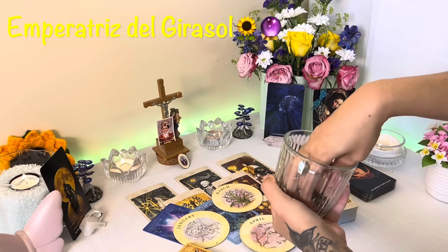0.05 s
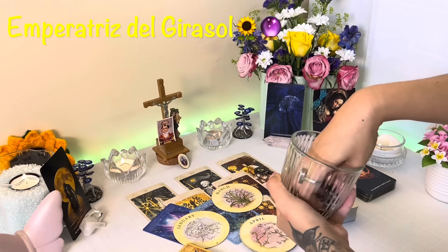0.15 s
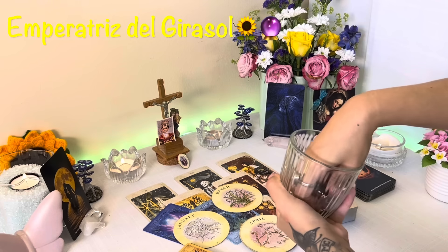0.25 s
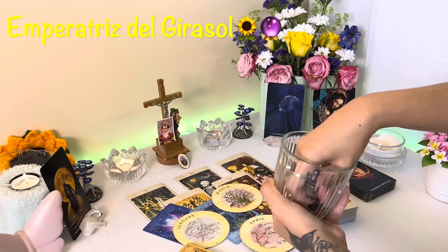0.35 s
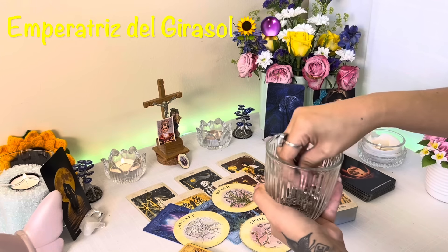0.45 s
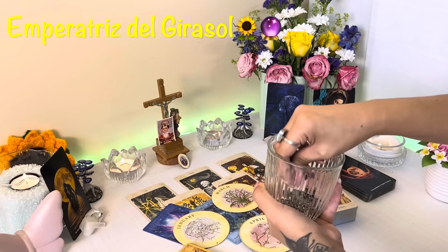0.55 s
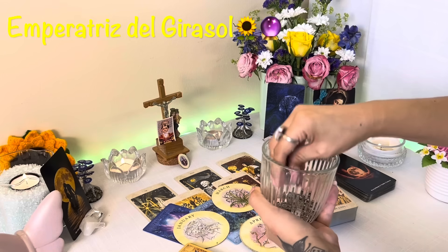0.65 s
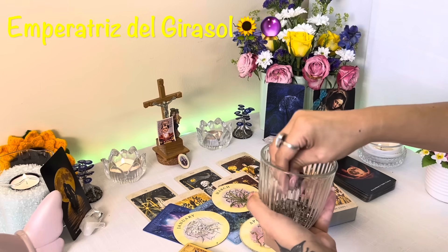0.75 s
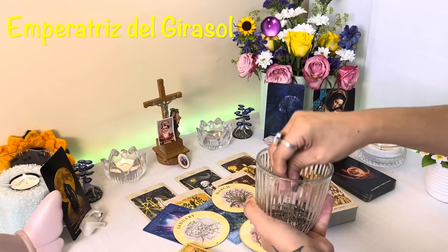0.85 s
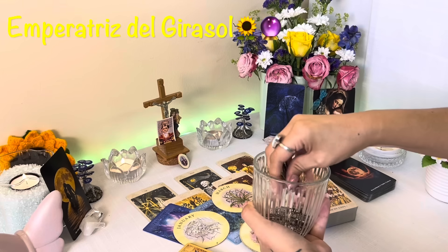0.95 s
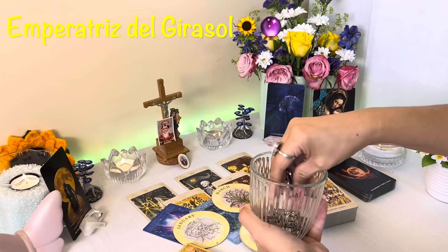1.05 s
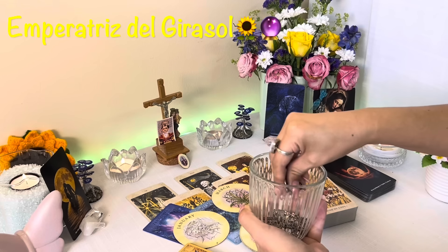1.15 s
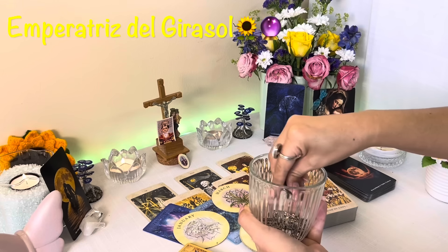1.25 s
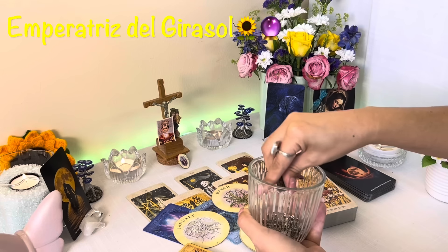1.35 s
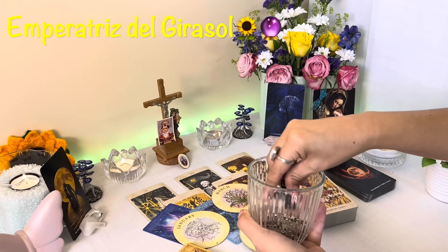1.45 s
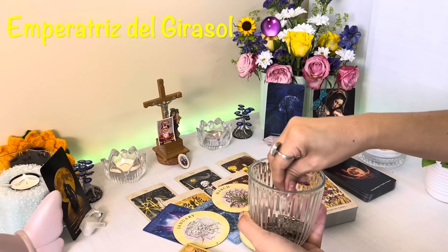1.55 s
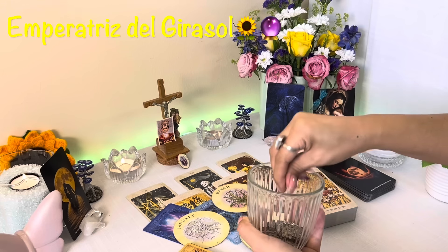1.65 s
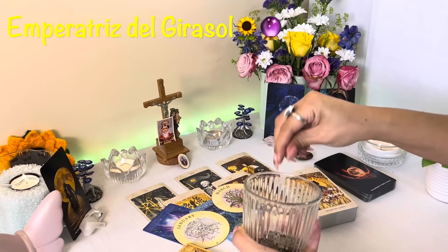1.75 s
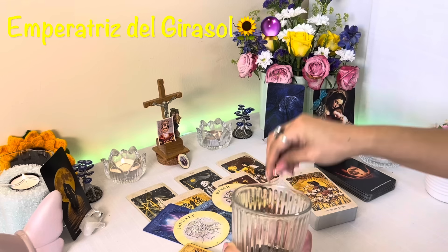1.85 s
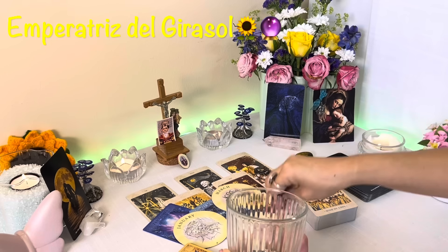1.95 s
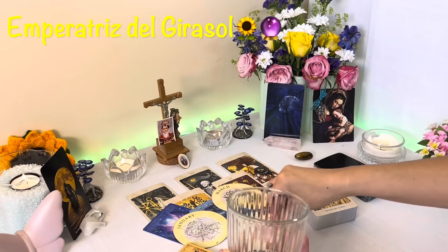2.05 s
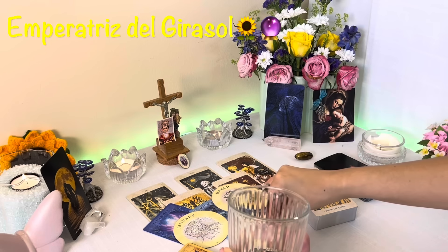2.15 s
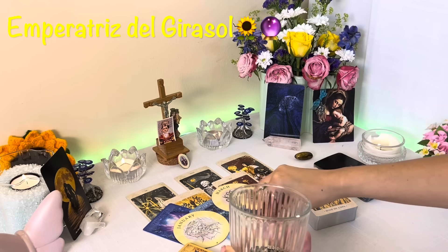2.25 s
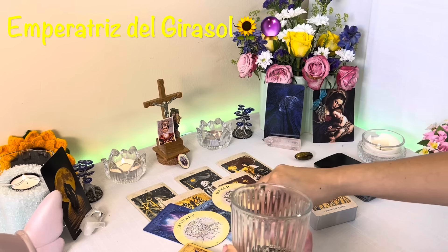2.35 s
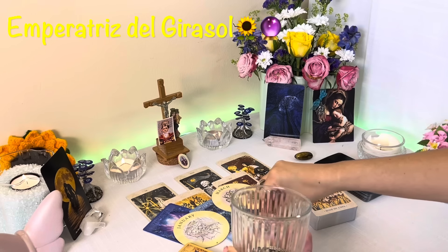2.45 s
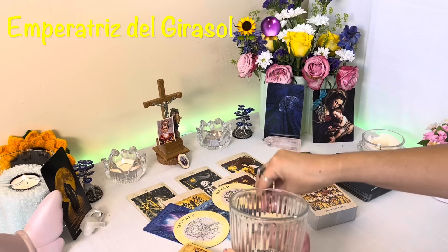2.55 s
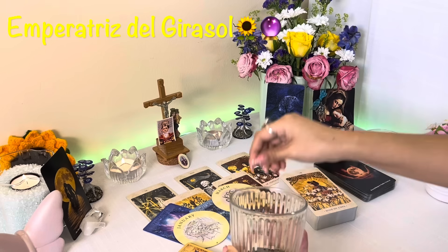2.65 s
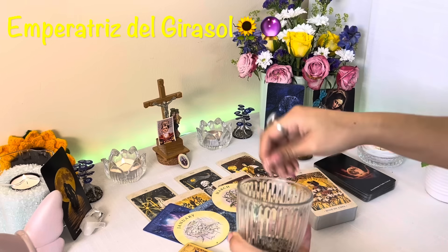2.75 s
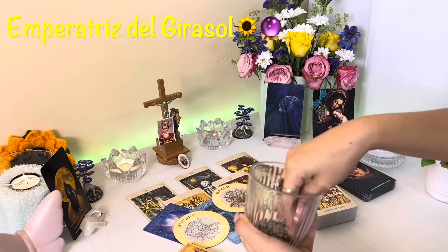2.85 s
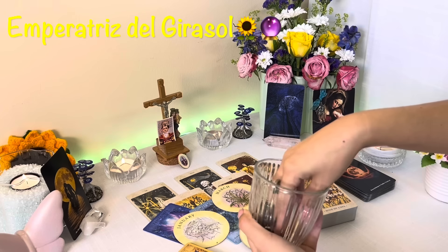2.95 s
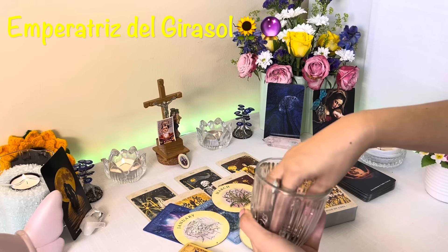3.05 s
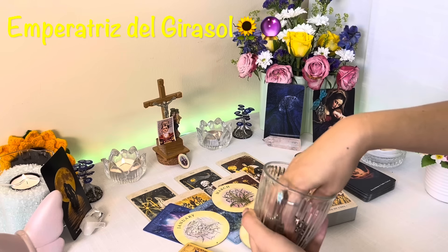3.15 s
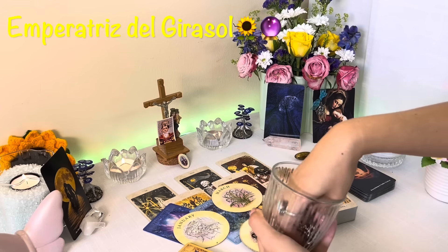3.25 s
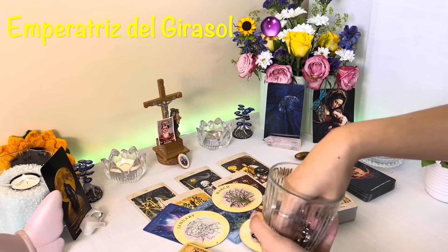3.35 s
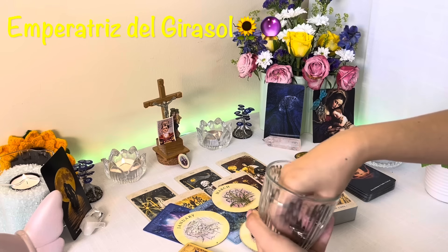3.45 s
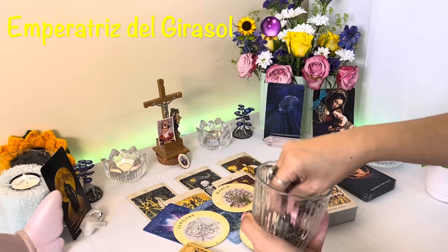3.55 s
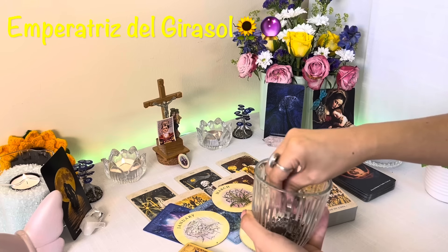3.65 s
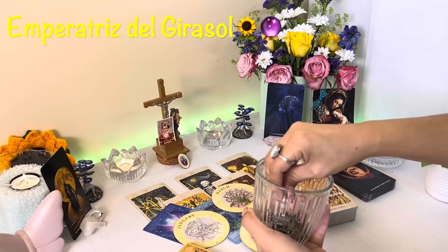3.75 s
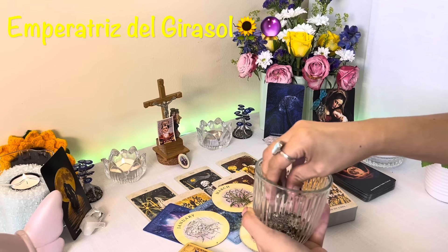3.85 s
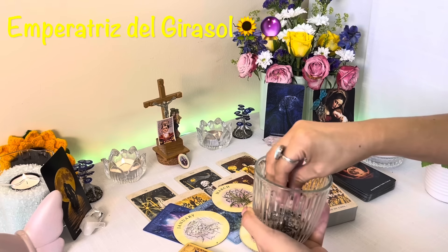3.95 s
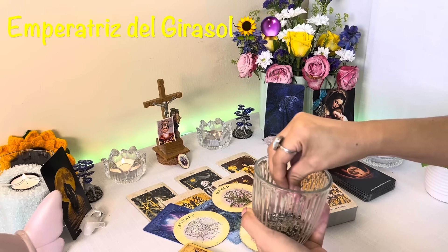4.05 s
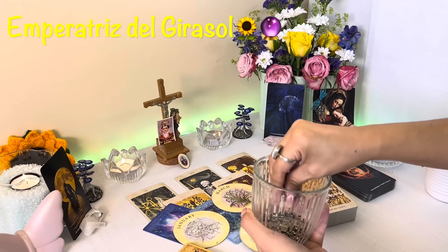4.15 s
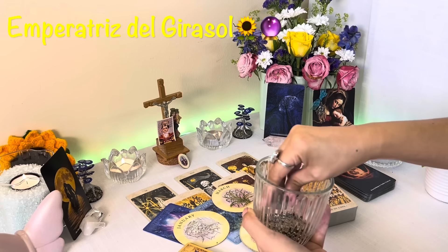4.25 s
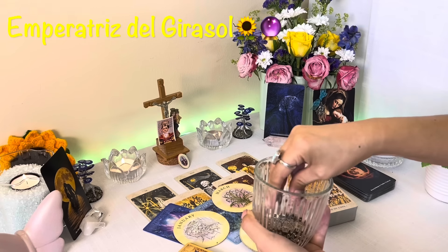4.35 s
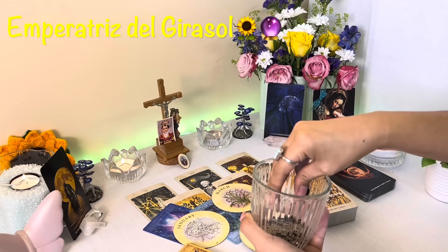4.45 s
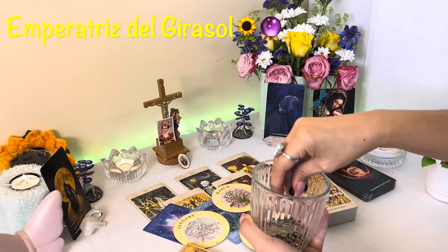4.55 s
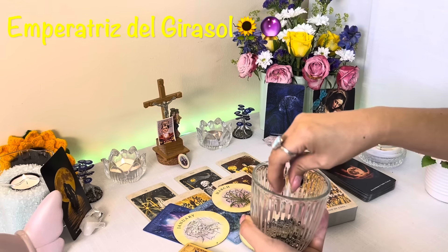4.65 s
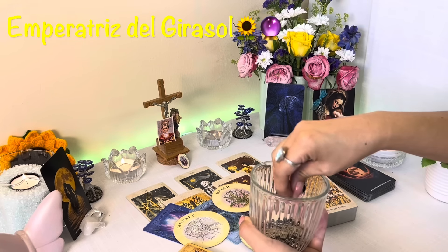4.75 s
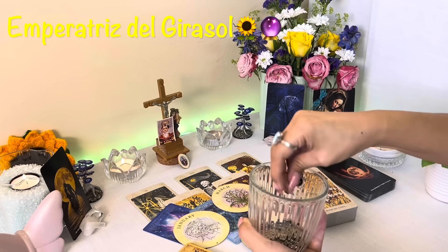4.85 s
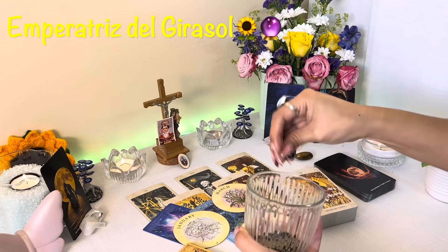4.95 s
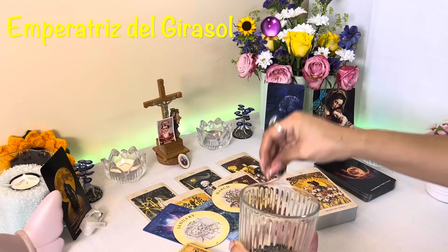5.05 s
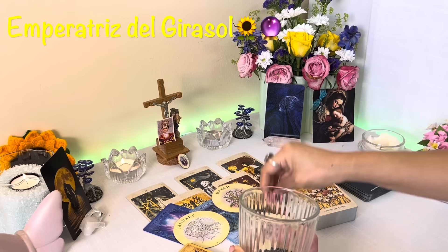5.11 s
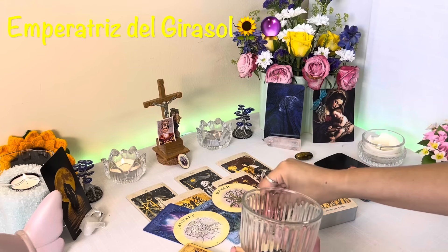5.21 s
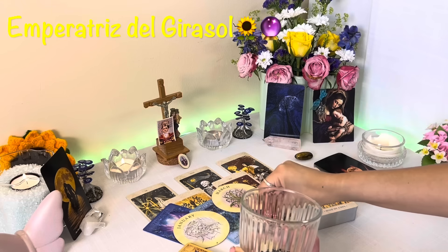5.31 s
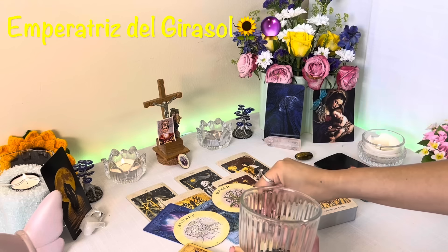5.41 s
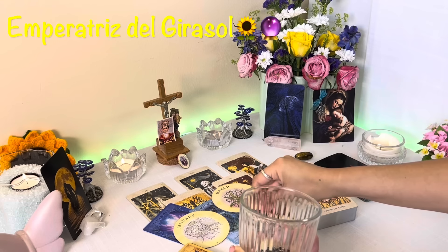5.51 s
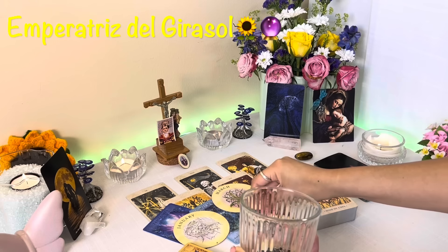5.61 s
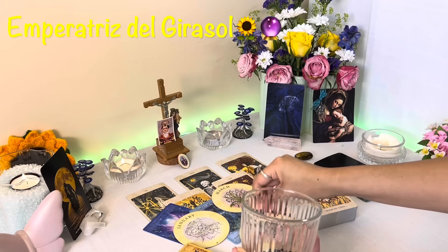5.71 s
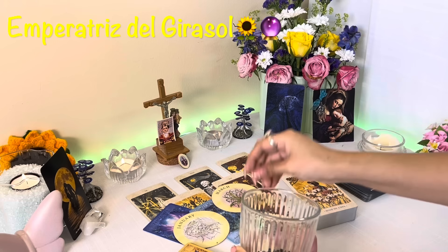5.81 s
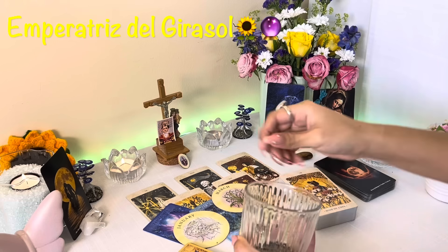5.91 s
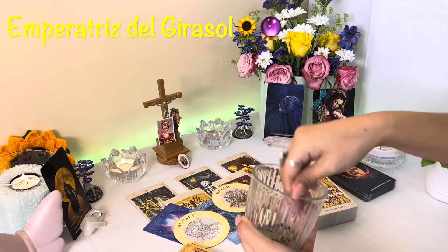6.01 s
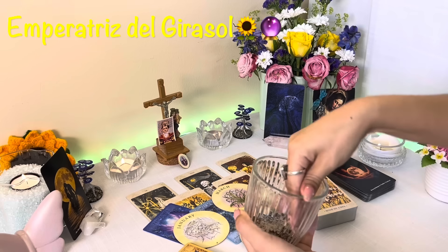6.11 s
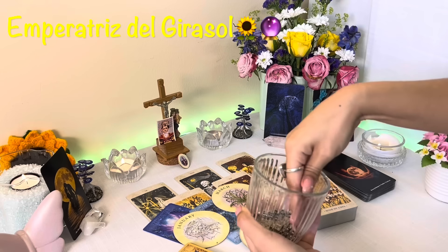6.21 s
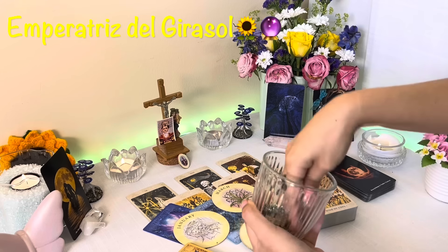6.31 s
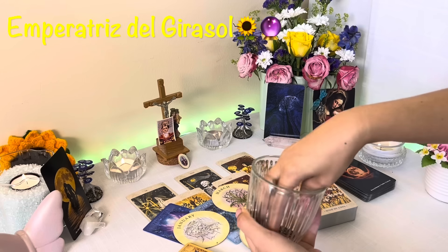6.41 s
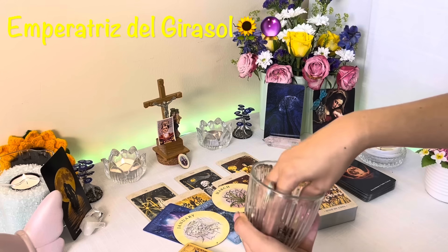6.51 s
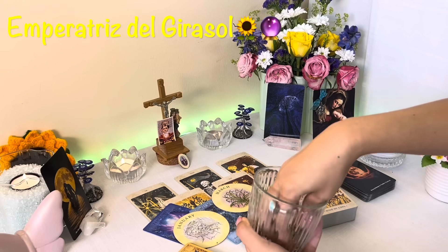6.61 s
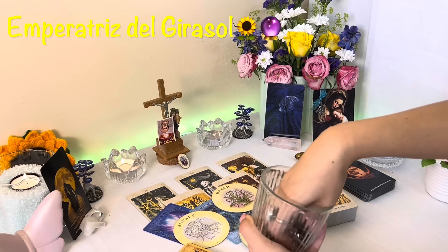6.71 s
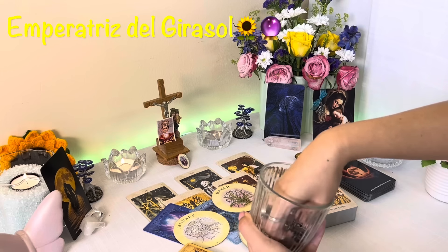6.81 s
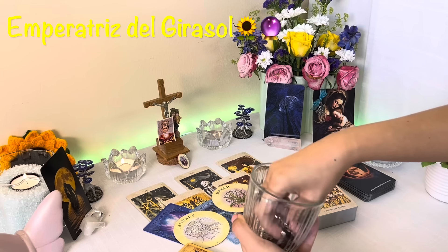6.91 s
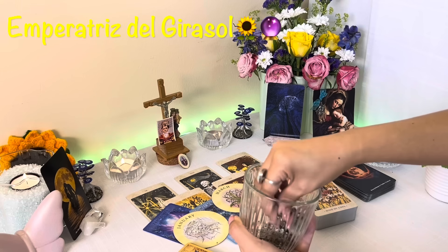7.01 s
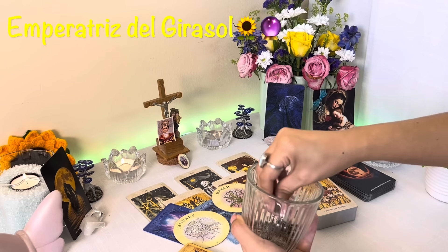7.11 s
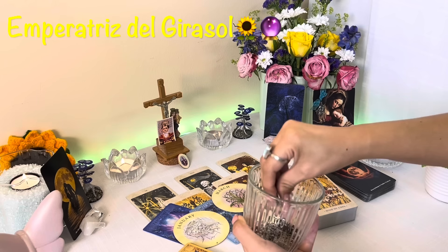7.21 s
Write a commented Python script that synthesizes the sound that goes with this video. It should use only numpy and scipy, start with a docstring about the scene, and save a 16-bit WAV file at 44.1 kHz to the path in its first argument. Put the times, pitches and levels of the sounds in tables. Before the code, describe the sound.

A close take in a small quiet room with a faint low hush and a short soft tail. From 0 to 0.6 s a hand already stirs tiny metal charms in a glass tumbler: dense bright rattle, jingle, glassy clinks, weakening quickly. From 0.7 to 1.7 s separate charms drop back with hard knocks and short clattering settles, strongest near 1.35 and 1.5, with thin finger clicks up to 2.1. At 2.25 a soft hand bump, then a cluster of dry taps and a slight slide on the table around 2.35-2.55. From 2.85 to 3.8 a busier stir, with sharp wall clinks and high pings; drops follow at 3.95, 4.05 and 4.3. Near quiet, then table taps and nudges at 5.4-5.7. Two clinks just after 6.0 lead to a final bright stir from 6.3 to 7.1 s, running out at the end.

```python
"""A hand stirs small metal charms in a ribbed glass tumbler, close to the microphone in a small quiet room.
The heap is dense random contacts driving short resonances; the glass wall is a set of damped modes.
Falling charms knock and ring, a finger ring or knuckles strike the wall, charms click between the fingers,
and between stirs charms are laid on the table with light clicks.
Table contacts and glass share one diffuse tail; coloured noise with low resonances makes the hush."""
import sys
import numpy as np
from scipy import signal
from scipy.fft import rfft, irfft
from scipy.io import wavfile
from scipy.ndimage import uniform_filter1d

SR = 44100
rng = np.random.default_rng(int(sys.argv[2]) if len(sys.argv) > 2 else 0)


def file_out(sig):
    """Save sig as 16-bit WAV at sys.argv[1]."""
    # one column per channel
    cols = np.atleast_2d(sig).T
    # limit, then scale
    lim = np.clip(cols, -1, 1)
    pcm = np.round(lim * 32767).astype(np.int16)
    wavfile.write(sys.argv[1], SR, pcm)


N = 320607
TIME = np.arange(N) / SR  # clock in seconds
TOP_HZ = 15750  # upper edge of the sound

# Spectrum of contacts in the heap. Each row: frequency in Hz, relative level in dB.
HEAP_COLOUR = [(300, -19.5), (650, -28), (900, 2), (1050, -3), (1300, -10), (2200, -1.5), (2850, -3),
               (3400, -6.5), (3800, -6.5), (5200, -0.5), (6300, -4), (7500, 5.5), (9600, 0), (12500, 3),
               (16000, -28.5)]
# Spectrum of a charm on the table. Each row: frequency in Hz, relative level in dB.
TABLE_COLOUR = [(100, -24), (500, -2), (1500, -1), (2200, -5), (3200, -1), (4500, -4), (6500, -2.5),
                (11000, -3), (16000, -11)]
# Dropped charms shake the heap and the wall, then come to rest. Each row: start in seconds, clatter in dB,
# jingle in dB, wall ring in dB, decay time t60 of the heap in seconds; levels are relative.
SETTLES = [(0.726, -33.5, -39, -48, 0.35), (0.799, -35, -36, -46, 0.18), (0.937, -32, -32, -36.5, 0.33),
           (1.344, -28.5, -30, -64, 0.32), (1.376, -32.5, -29.5, -31, 0.22), (1.461, -59, -59, -52, 0.44),
           (1.524, -30.5, -28.5, -45, 0.43), (1.63, -39.5, -56.5, -53, 0.35), (3.942, -33, -31, -49, 0.43),
           (4.038, -33, -43, -44, 0.24), (4.323, -29.5, -27.5, -39, 0.22), (4.364, -31.5, -29.5, -61, 0.19)]


def amp(db):
    """Amplitude ratio of a level: 20 dB for each factor of ten."""
    return 10 ** (np.asarray(db) / 20)


def unit(x):
    """Normalization of mean power: the rms becomes 1."""
    return x / np.sqrt(np.mean(x ** 2))


def add(out, s, x):
    """Superposition: mix x into out from s seconds on."""
    i = int(s * SR)
    out[i:i + len(x)] += x[:N - i]


def fade(t, t60):
    """Exponential decay by 60 dB in t60 seconds."""
    return np.exp(-np.log(1000) * t / t60)


def arch(s, length):
    """Half-cosine envelope: a smooth rise and fall around s, length seconds long."""
    return np.cos(np.pi * np.clip((TIME - s) / length, -.5, .5))


def walk(rate):
    """Piecewise-linear random modulation: normal values, rate a second, joined by straight lines."""
    count = int(TIME[-1] * rate) + 2
    return np.interp(TIME * rate, np.arange(count), rng.standard_normal(count))


def colour(x, points):
    """Minimum-phase filtering through (Hz, dB) points, by folding the cepstrum to positive times."""
    size = 4096
    hz, db = np.transpose(points)
    grid = np.maximum(np.arange(size // 2 + 1) * SR / size, 1)
    log_gain = np.log(amp(np.interp(np.log(grid), np.log(hz), db)))
    cepstrum = irfft(log_gain)
    cepstrum[1:size // 2] *= 2
    cepstrum[size // 2 + 1:] = 0
    response = irfft(np.exp(rfft(cepstrum)))
    return signal.fftconvolve(x, response)[:len(x)]


def ring(x, hz, t60):
    """Damped harmonic oscillator: one decaying mode, a complex pole pair, driven by x."""
    pole = np.exp((2j * np.pi * hz - np.log(1000) / t60) / SR)
    return signal.lfilter([0, pole.imag], [1, -2 * pole.real, abs(pole) ** 2], x)


def band(x, hz, width_hz):
    """Second-order resonance: the quality factor is centre frequency over bandwidth."""
    return signal.lfilter(*signal.iirpeak(hz, hz / width_hz, fs=SR), x)


def sparks(rate, spread_db):
    """Random impulse train: clicks, about rate a second, of either sign and unequal size."""
    x = np.zeros(N)
    places = np.flatnonzero(rng.random(N) < rate / SR)
    sizes = amp(spread_db * rng.standard_normal(len(places)))
    x[places] = rng.choice([-1, 1], len(places)) * sizes
    return x


def contacts(rate, spread_db, even_s):
    """Short-time power levelling: random clicks made nearly steady over even_s seconds."""
    x = sparks(rate, spread_db)
    power = uniform_filter1d(x ** 2, max(int(even_s * SR), 1))
    return unit(x / np.sqrt(np.abs(power) + np.mean(power) / 20))


def driven(clicks, gain, body):
    """Source-filter excitation: clicks scaled by gain drive a body; a steady gain of 1 gives rms 1."""
    return body(clicks * gain) / np.std(body(clicks))


def tumbler(x, tilt_db):
    """Modal vibration of the glass wall; a harder contact (tilt in dB per octave) favours the treble."""
    # Modes damped by the holding hand. Each row: frequency in Hz, level before the tilt in dB, t60 in seconds.
    glass = [(1821, -20, .5), (1834, -17, .1), (4518, -12, .25), (4533, 0, .11), (7966, 0, .035),
             (8010, -9, .12), (12180, -11, .06), (14690, -18, .05)]
    pivot_hz = glass[3][0]
    out = 0
    for hz, db, t60 in glass:
        gain_db = db + tilt_db * np.log2(hz / pivot_hz)
        out = out + amp(gain_db) * ring(x, hz, t60)
    return out


def hits(table, points, body_hz, body_width_hz, body_db, ring_db, ring_width_hz, gain_db, rise_s, t60):
    """Noise-burst impact: a short crack, a thud of the body and a choked resonant ring."""
    out, t = np.zeros(N), TIME[:SR // 8]
    force = np.minimum(t / rise_s, 1) * fade(t, t60)

    def thud(x):
        return band(band(x, body_hz, body_width_hz), body_hz, body_width_hz)

    for s, db, thud_db, hz in table:
        crack, push, bite = rng.standard_normal((3, len(t)))
        hit = driven(crack, force, lambda x: colour(x, points))
        hit += amp(thud_db + body_db) * driven(push, force, thud)
        hit += amp(ring_db) * driven(bite, force, lambda x: band(x, hz, ring_width_hz))
        add(out, s, amp(db + gain_db) * hit)
    return out


def hush():
    """Filtered stationary noise: a broadband hush with a few low resonances."""
    # Spectrum of the air noise. Each row: frequency in Hz, relative level in dB.
    air_colour = [(15, -45), (25, 1), (59, -1), (107, -10), (253, -5.5), (322, -11.5), (359, 1.5),
                  (410, -13), (482, -3.5), (523, -6), (666, -0.5), (1270, -16), (9050, -26), (10900, -24),
                  (15500, -27.5)]
    # Low resonances of the room. Each row: frequency in Hz, half the width of one filter stage in Hz, rms in dB.
    drones = [(48.5, 2.3, -68), (68.8, 12.7, -62.5), (148, 13, -69.5), (390, 32, -64.5), (482, 10, -61),
              (667.7, 11.3, -59), (1630, 106, -66)]
    out = amp(-49.5) * unit(colour(rng.standard_normal(N), air_colour))
    for hz, half_width, db in drones:
        noise = rng.standard_normal(N)
        out += amp(db) * unit(band(band(noise, hz, 2 * half_width), hz, 2 * half_width))
    return out


def room(x, wet_db=-13, t60=0.23, gap_s=0.0084):
    """Diffuse reverberation: convolution with a short decaying noise tail after a gap."""
    t = TIME[:SR // 2]
    tail = rng.standard_normal(len(t)) * fade(t, t60) * (t > gap_s)
    return x + amp(wet_db) * signal.fftconvolve(x, tail / np.linalg.norm(tail))[:N]


def bump(s=2.246, db=-29):
    """Modal response to a soft blow: the hand lands on the table as a sum of decaying sines."""
    # Modes of the table top. Each row: frequency in Hz, relative level in dB, t60 in seconds.
    table_modes = [(104, -17, .07), (180, -19, .04), (273, -6.5, 0.058), (720, -11, 0.018),
                   (1070, -11, .025)]
    out, t = np.zeros(N), TIME[:SR // 4]
    for hz, mode_db, t60 in table_modes:
        add(out, s, amp(db + mode_db) * np.sin(2 * np.pi * hz * t) * fade(t, t60))
    return out


def slides():
    """Friction as dense micro-impacts: fingers nudge the laid charms along."""
    # Each row: start, strongest moment and end in seconds, peak level in dB.
    pushes = [(2.34, 2.40, 2.78, -50.5), (5.36, 5.41, 5.8, -48), (5.57, 5.61, 5.74, -47)]
    force = 0
    for start, top, end, db in pushes:
        force = force + amp(db) * np.interp(TIME, [start, top, end], [0, 1, 0]) ** 2
    clicks = contacts(rate=1200, spread_db=7.5, even_s=0.014)
    return driven(clicks, force, lambda x: colour(x, TABLE_COLOUR))


def taps():
    """Impact on a broad woody resonance: charms are laid on the table."""
    # Each row: start in seconds, relative level in dB, relative woody body in dB, ring in Hz.
    landings = [(2.353, -22.5, -19, 3570), (2.369, -22, -24, 3670), (2.389, -18.5, -25, 3460),
                (2.395, -19, -30, 3660), (2.408, -28.5, 6, 3560), (2.46, -33.5, 7.5, 3040),
                (2.507, -40, 4, 3020), (2.537, -37, 6, 3010), (4.719, -40, -16, 6240),
                (4.761, -38, -16, 2960), (5.376, -34, -8, 3290), (5.399, -24.5, -1, 3160),
                (5.465, -30, -20, 3570), (5.593, -26.5, -5, 3220), (5.605, -17, -2, 8000)]
    return hits(landings, TABLE_COLOUR, body_hz=1560, body_width_hz=4400, body_db=-6,
                ring_db=-6, ring_width_hz=170, gain_db=-8, rise_s=0.00089, t60=0.043)


def finger_clicks():
    """Impact between small hard bodies: charms click against each other between the fingers."""
    # Each row: start in seconds, relative level in dB, relative dull part in dB, ring in Hz.
    clicks = [(1.101, -16.5, -32, 11600), (1.257, -33, -27, 12400), (1.278, -28, -27, 14500),
              (1.293, -29, -33, 14800), (1.737, -25.5, -8.5, 12600), (1.862, -17.5, -37, 11900),
              (1.895, -31, -21, 12900), (2.078, -34, -9, 10600), (2.11, -30.5, -27, 11000),
              (4.268, -30.5, -23, 14300), (4.577, -32.5, -27, 13700), (5.232, -33, -23, 13700),
              (5.53, -22, -5, 10800), (5.66, -32, 0, 13000), (5.703, -31.5, -8, 13200),
              (6.304, -28, -4, 12300), (6.51, -15, -27, 14400)]
    # Spectrum of charm on charm. Each row: frequency in Hz, relative level in dB.
    click_colour = [(300, -21), (2000, -23), (5000, -11.5), (7500, 1), (10000, -3.5), (12500, 8),
                    (14000, -7), (16000, -5)]
    return hits(clicks, click_colour, body_hz=3030, body_width_hz=7700, body_db=4.5,
                ring_db=1, ring_width_hz=560, gain_db=-5, rise_s=0.0021, t60=0.018)


def clinks(tick_db=-5, tick_t60=0.043):
    """Impulse response of the wall: a finger ring or knuckle strikes it with a noisy tick."""
    # Each row: start in seconds, level in dB, hardness in dB per octave.
    strikes = [(.186, -26, -7), (0.312, -43, -17), (0.504, -32, -9.5), (1.539, -35.5, -13.5),
               (2.84, -24, -2), (3.025, -22.5, -6.5), (3.245, -35.5, -15.5), (3.266, -26, -7),
               (3.389, -17, -1.5), (3.433, -24.5, 2.5), (3.477, -28, -7), (3.550, -22.5, 0),
               (4.299, -40, -6.5), (6.027, -23, 0.5), (6.068, -35.5, 2), (6.254, -49, -11.5),
               (6.759, -26, -0.5), (6.812, -31, -3), (6.884, -27, -3.5)]
    out, t = np.zeros(N), TIME[:SR // 2]
    impulse = 1. * (t == 0)
    for s, db, hardness_db in strikes:
        tick = unit(colour(rng.standard_normal(len(t)), HEAP_COLOUR)) * fade(t, tick_t60)
        add(out, s, amp(db) * (tumbler(impulse, hardness_db) + amp(tick_db) * tick))
    return out


def rubs(gain_db=-2):
    """Repeated impact excitation: the finger ring and knuckles chatter along the ribbed wall."""
    # Each row: middle in seconds, length in seconds, relative level in dB, hardness in dB per octave.
    swells = [(0.113, 0.14, -29.5, -10), (.21, 0.08, -30.5, -18), (0.325, 0.096, -32, -24),
              (3.06, 0.048, -23, 5), (3.28, 0.11, -27, -2.5), (3.39, .05, -31, 8), (3.505, 0.038, -24, 0),
              (3.555, 0.048, -27, 0.5), (6.442, 0.053, -29.5, -5.5), (6.745, .14, -33, 0),
              (6.99, 0.1, -29.5, 7.5)]
    clicks = contacts(rate=300, spread_db=3, even_s=.03)
    out = 0
    for s, length, db, hardness_db in swells:
        force = amp(db + gain_db) * arch(s, length)
        out = out + driven(clicks, force, lambda x: tumbler(x, hardness_db))
    return out


def knocks():
    """Impact with a bottom resonance: charms knock on the heap above the tumbler's thick bottom."""
    # Each row: start in seconds, relative level in dB, relative thud of the bottom in dB, ring in Hz.
    blows = [(.186, -14, -17, 11800), (.474, -22, -15, 13600), (.5, -14.5, -5, 12800),
             (.727, -8, -14, 14650), (.8, -20, -13, 12000), (.935, -7, -13.5, 12700),
             (1.341, -3, -7.5, 11600), (1.521, -8.5, -22, 12400), (1.543, -11, -16, 12000),
             (2.886, -19, -23, 12700), (3.133, -9, -40, 12100), (3.366, -12.5, -32, 11900),
             (3.782, -10, -12, 13300), (3.942, -5.5, -13.5, 12250), (4.033, -21, -19, 12900),
             (4.321, -11, -10, 12130), (4.364, -22, -20, 12100), (6.333, -11.5, -28, 12200),
             (6.459, -7.5, -40, 12200), (6.612, -12, -40, 14600)]
    # Spectrum of one hard knock. Each row: frequency in Hz, relative level in dB.
    knock_colour = [(300, -53), (1350, -10.5), (2200, -12.5), (2850, -4.5), (3700, -17), (5000, -10.5),
                    (7500, -4), (9500, -5.5), (12600, -5), (14000, -12), (16000, -6.5)]
    return hits(blows, knock_colour, body_hz=970, body_width_hz=400, body_db=-2,
                ring_db=0.5, ring_width_hz=270, gain_db=-5, rise_s=0.00062, t60=0.015)


def pings(gain_db=-1, chatter=.5):
    """Resonant build-up and free decay: a charm chatters against the glass, then rings out."""
    # Each row: start in seconds, pitch in Hz, relative peak in dB, swell in seconds, t60 in seconds.
    notes = [(0.087, 12500, -10, 0.014, 0.083), (.501, 12340, -13.5, .003, 0.054),
             (1.285, 14500, -31, .015, 0.21), (1.36, 14618, -32, .01, .16),
             (1.465, 12350, -33.5, 0.044, .25), (1.523, 12230, -8.5, 0.01, 0.11),
             (1.535, 14000, -13, .026, 0.11), (3.12, 12241, -14.5, 0.064, 0.11),
             (3.45, 13300, -21.5, 0.023, 0.14), (3.632, 12800, -14, 0.025, .085),
             (3.66, 14450, -14, 0.027, .1), (3.68, 13300, -14, 0.014, .09), (3.755, 14100, -9, .007, .1),
             (4.036, 12796, -20, 0.025, 0.057), (4.058, 12820, -6, 0.0048, 0.078),
             (4.326, 12250, -22, 0.0072, 0.2), (4.395, 14300, -23, .012, 0.055),
             (5.66, 13000, -27.5, .003, 0.063), (5.66, 14040, -31, .003, 0.087),
             (6.53, 13190, -19, .01, .06), (6.71, 12060, -14, 0.011, .07), (6.852, 12740, -11.5, .01, .07),
             (7.09, 14000, -13, 0.0082, .09)]
    out, t = np.zeros(N), TIME[:SR // 2]
    for s, hz, db, swell, t60 in notes:
        kicks = 1 + chatter * unit(band(rng.standard_normal(len(t)), 90, 120))
        drive = np.sin(2 * np.pi * hz * t) * kicks * (t < swell)
        note = ring(drive, hz, t60)
        add(out, s, amp(db + gain_db) * note / np.abs(note).max())
    return out


def shaken_wall(hardness_db=-11.5):
    """Impulse response: each drop rings the tumbler once; hardness is in dB per octave."""
    out, t = np.zeros(N), TIME[:SR // 2]
    for s, _, _, db, _ in SETTLES:
        add(out, s, amp(db) * tumbler(1. * (t == 0), hardness_db))
    return out


def settles(rise_s=.0034):
    """Power addition of decaying forces: clatter and jingle start suddenly and die away after each drop."""
    power = 0
    for s, clatter_db, jingle_db, _, t60 in SETTLES:
        age = np.maximum(TIME - s, 0)
        force = np.minimum(age / rise_s, 1) * fade(age, t60)
        power = power + np.outer(amp([clatter_db, jingle_db]), force) ** 2
    return np.sqrt(power)


def tumbles(gain_db=-12, t60=0.053, rise_s=0.0036):
    """Transient force envelope: clumps tumble off the fingers with a quick start and short run-out."""
    # Each row: start in seconds, relative level in dB.
    clumps = [(.186, -7), (0.224, -11.5), (.575, -19), (3.048, 1), (3.123, -2.5), (3.627, -5), (3.69, -3.5),
              (3.727, -5.5), (3.758, -12), (6.337, -4), (6.551, -5), (6.701, -2.5), (6.755, -5),
              (6.935, -16), (6.986, -11), (7.075, -9)]
    force, t = np.zeros(N), TIME[:SR // 5]
    for s, db in clumps:
        add(force, s, amp(db + gain_db) * np.minimum(t / rise_s, 1) * fade(t, t60))
    return force


def scoops():
    """Smooth force envelopes: clatter and jingle swell as the fingers dig deeper and lift charms."""
    # Each row: middle in seconds, length in seconds, relative clatter in dB, relative jingle in dB.
    digs = [(0.104, 0.12, -31, -24.5), (2.96, 0.15, -35, -30), (3.056, 0.16, -28.5, -26.5),
            (3.175, 0.19, -29.5, -26.5), (3.27, 0.06, -31, -24), (3.391, 0.032, -32, -27.5),
            (3.538, 0.058, -47, -31), (3.666, 0.11, -34, -27), (3.8, 0.13, -38, -29),
            (6.435, 0.11, -26, -29), (6.59, 0.082, -50, -30), (6.653, .04, -32, -25),
            (6.72, 0.29, -32.5, -33.5)]
    forces = 0
    for s, length, clatter_db, jingle_db in digs:
        forces = forces + np.outer(amp([clatter_db, jingle_db]), arch(s, length))
    return forces


def stirs(unevenness_db=2.8, attack_s=0.011, t60=0.28):
    """Attack, sustain and decay of force: each stir starts quickly, tires and runs out after the hand stops."""
    # Each row: start in seconds, stop in seconds, relative level in dB, tiring in dB per second,
    # jingle in dB against the level, bottom thuds in dB against the level.
    strokes = [(-.05, 0.581, -28.5, 18, -0.5, -11), (2.881, 3.815, -33.5, 2, -0.5, -14),
               (6.313, 7.141, -32, 4.5, -0.5, -15.5)]
    forces = 0
    for start, stop, db, tiring_db, jingle_db, bottom_db in strokes:
        attack = np.clip((TIME - start) / attack_s, 0, 1)
        hold = amp(db - tiring_db * (np.clip(TIME, start, stop) - start))
        release = fade(np.maximum(TIME - stop, 0), t60)
        forces = forces + np.outer([1, amp(jingle_db), amp(bottom_db)], attack * hold * release)
    return forces * amp(unevenness_db * walk(25))


def wall_contacts(force, rate, tilt_db):
    """Random impact excitation: irregular blows keep the tumbler's modes ringing."""
    clicks = contacts(rate=rate, spread_db=3, even_s=.06)
    return driven(clicks, force, lambda x: tumbler(x, tilt_db))


def tinkles(force, rate_per_s=45, gain_db=2, t60=0.034, tick_db=-5, tick_t60=.008,
            lowest_hz=2600, overtone=2.3):
    """Inharmonic two-mode impact: a small charm clinks with a bright tick, its note and a stronger overtone."""
    out, t = np.zeros(N), TIME[:SR // 20]
    for s in np.flatnonzero(rng.random(N) < rate_per_s / SR) / SR:
        hz = rng.uniform(lowest_hz, TOP_HZ / overtone)
        note = .5 * np.sin(2 * np.pi * hz * t) + np.sin(2 * np.pi * hz * overtone * t)
        tick = amp(tick_db) * rng.standard_normal(len(t)) * fade(t, tick_t60)
        bright_tick = np.diff(tick, prepend=0)  # differencing favours the treble
        level = amp(gain_db + rng.uniform(-5, 3.2)) * np.interp(s, TIME, force)
        add(out, s, level * (note * fade(t, t60) + bright_tick))
    return out


def heap(force, bottom_force, shared_db=-7, count=40):
    """Granular superposition: many choked resonators over a crackle and thuds of the glass bottom."""
    points_hz, points_db = np.transpose(HEAP_COLOUR)
    grains = 0
    for hz in np.linspace(2300, 15500, count) + rng.uniform(-120, 120, count):
        activity = amp(3.5 * walk(22))  # each piece grows louder and softer by itself
        piece = ring(sparks(rate=150, spread_db=4) * activity, hz, t60=.011)
        grains = grains + amp(np.interp(hz, points_hz, points_db)) * piece
    crackle = unit(colour(contacts(rate=2000, spread_db=-3.0, even_s=0.019), HEAP_COLOUR))
    bottom_clicks = contacts(rate=500, spread_db=0.5, even_s=0.057)
    thuds = unit(band(band(bottom_clicks, 880, 220), 936, 190))
    return force * (unit(grains) + amp(shared_db) * crackle) + bottom_force * thuds


def stirring(clatter_db=-0.5, jingle_db=-2, charms_db=5):
    """Stochastic excitation of modes: dense contacts crackle, ring single charms and knock on the glass."""
    # Modes of the jostling charms. Each row: frequency in Hz, relative level in dB, t60 in seconds.
    charms = [(11790, -3, .035), (11930, -7, .025), (12245, -1, .032), (12660, -7, .025), (12796, -4, .03),
              (13190, -5, .035), (14015, -8, .04), (14240, -10, .035), (14450, -8, .03), (14620, -6, .04),
              (14835, -8, .035)]
    # Spectrum of the choked jingling. Each row: frequency in Hz, relative level in dB.
    jingle_colour = [(8000, -34), (10000, -4.5), (11300, 6), (12300, 7), (13200, 0.5), (13700, -25),
                     (14600, -32), (16000, -4.5)]
    effort, stir_jingle, stir_bottom = stirs()
    falling = tumbles()
    dug_clatter, dug_jingle = scoops()
    drop_clatter, drop_jingle = settles()
    # independent forces add in power
    clatter = np.linalg.norm([effort, dug_clatter, drop_clatter, amp(-8) * falling], axis=0)
    jingle = np.linalg.norm([stir_jingle, dug_jingle, drop_jingle, falling], axis=0)
    bottom = np.linalg.norm([stir_bottom, amp(-18) * dug_clatter, amp(-8.5) * drop_clatter], axis=0)

    out = heap(clatter * amp(clatter_db), bottom) + tinkles(clatter)
    jingle_clicks = contacts(rate=1700, spread_db=3.5, even_s=0.064)
    out += driven(jingle_clicks, jingle * amp(jingle_db), lambda x: colour(x, jingle_colour))
    total = np.sqrt(sum(amp(db) ** 2 for _, db, _ in charms))
    for hz, db, t60 in charms:
        clicks = contacts(rate=240, spread_db=4, even_s=.06) * amp(2 * walk(15))
        out += driven(clicks, jingle * amp(db + charms_db) / total, lambda x: ring(x, hz, t60))
    # metal on the wall wakes its high modes, knuckles mostly the lowest
    metal = effort * amp(-5.5) + drop_clatter * amp(-17)
    out += wall_contacts(metal, rate=330, tilt_db=-5)
    return out + wall_contacts(effort * amp(-18), rate=140, tilt_db=-26)


def scene():
    """Linear superposition: glass and table share the room, over its hush."""
    table = bump() + slides() + taps()
    glass_and_charms = stirring() + rubs() + shaken_wall() + knocks() + finger_clicks() + pings() + clinks()
    return (room(glass_and_charms + table) + hush())[None]


def record(dry):
    """Saturation and band limiting: the recorder rounds the highest peaks and cuts the top steeply."""
    rounded = dry / (1 + (dry / .65) ** 6) ** (1 / 6)
    return signal.sosfilt(signal.ellip(10, .2, 70, TOP_HZ, fs=SR, output="sos"), rounded)


dry = scene()
out = record(dry)
file_out(out)
```